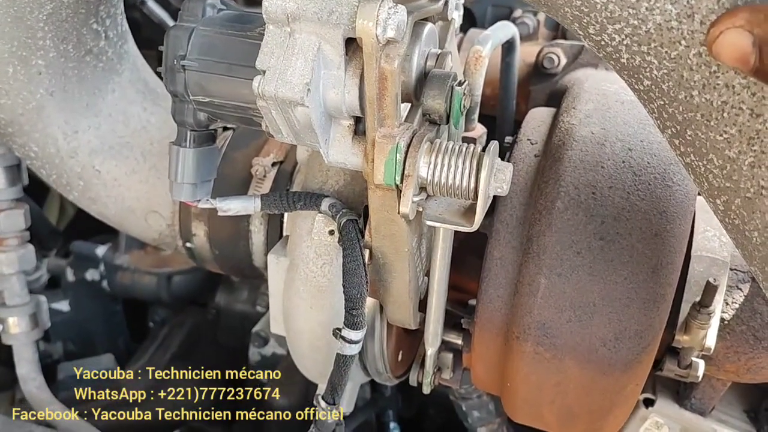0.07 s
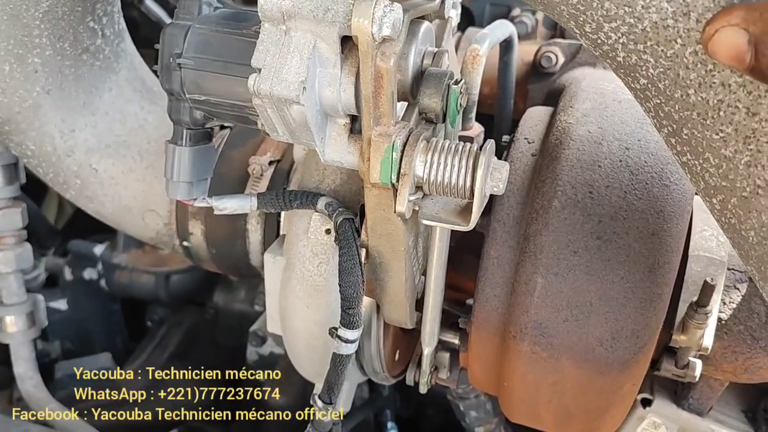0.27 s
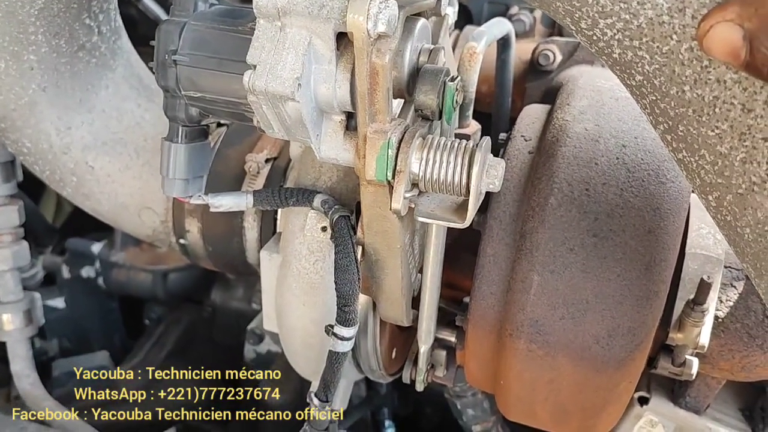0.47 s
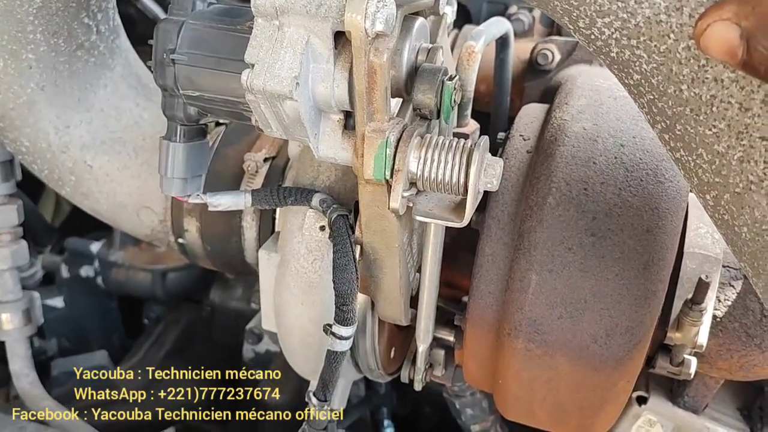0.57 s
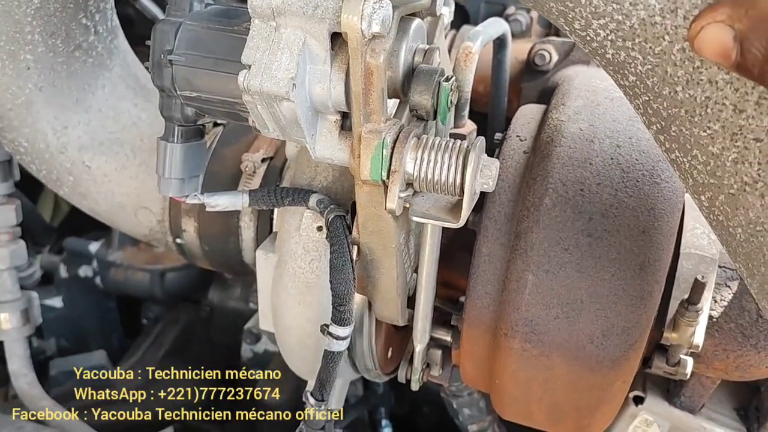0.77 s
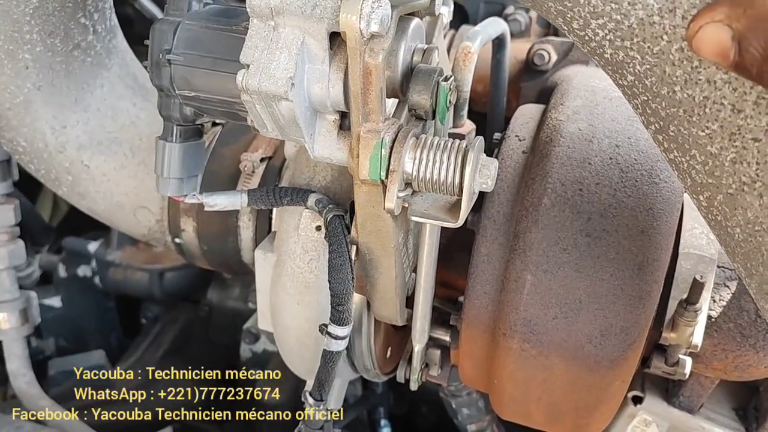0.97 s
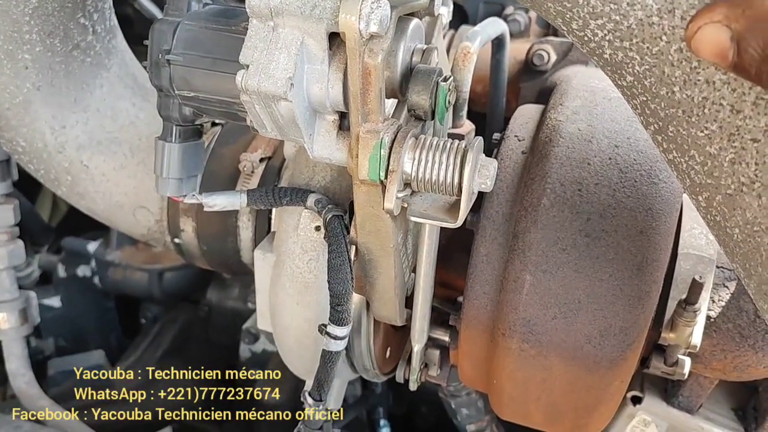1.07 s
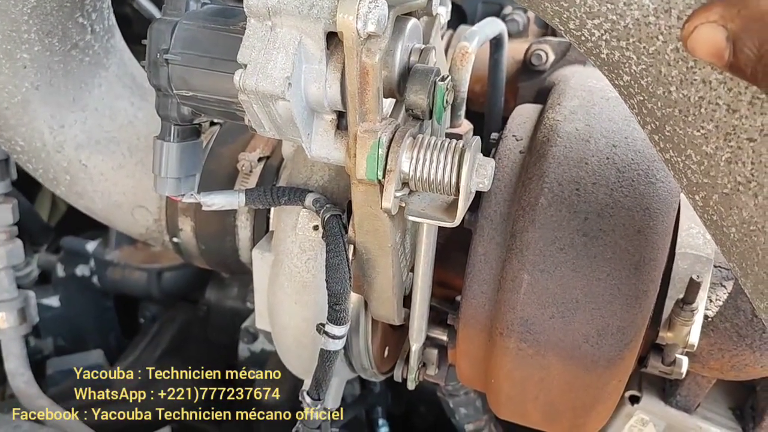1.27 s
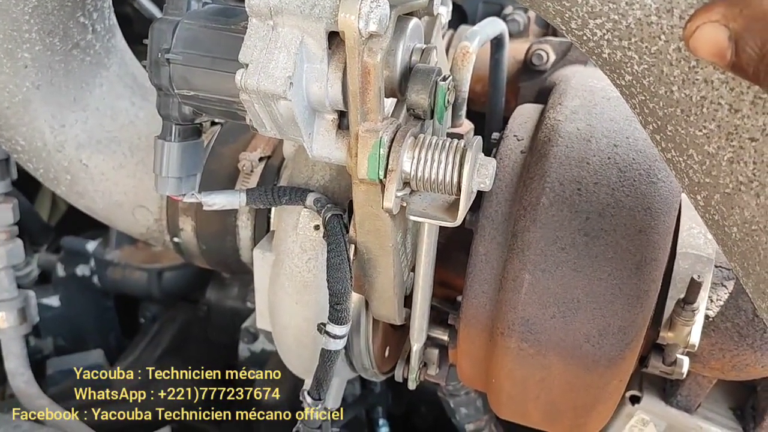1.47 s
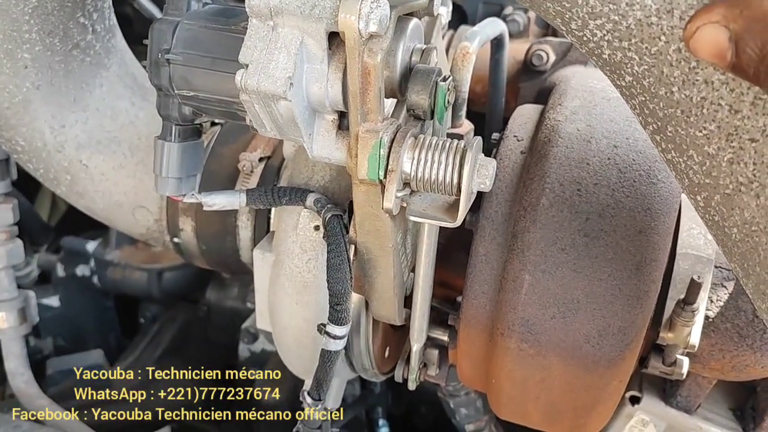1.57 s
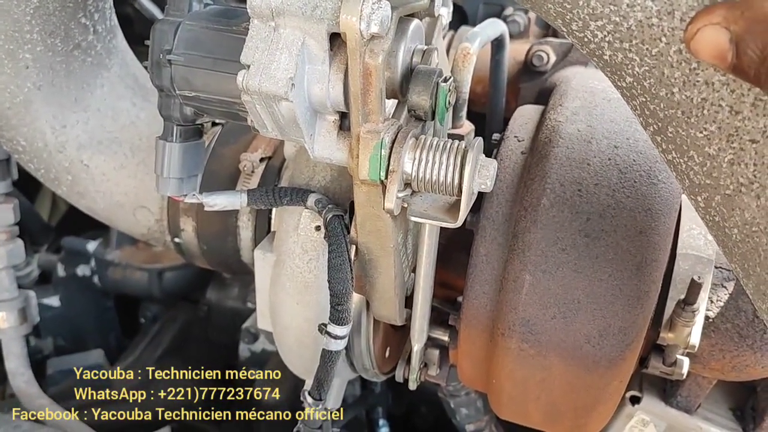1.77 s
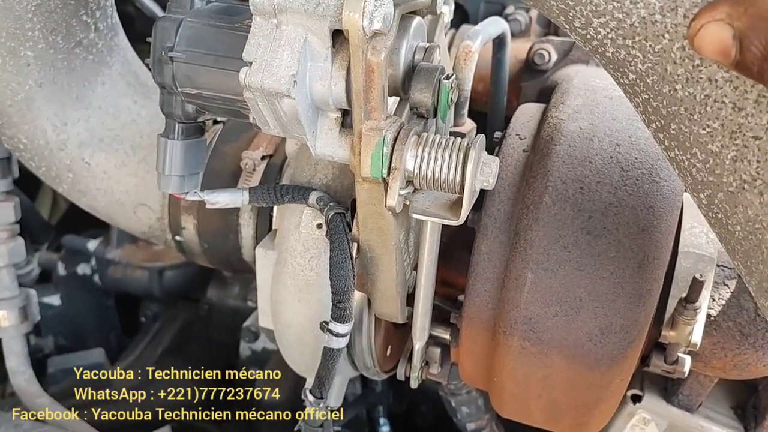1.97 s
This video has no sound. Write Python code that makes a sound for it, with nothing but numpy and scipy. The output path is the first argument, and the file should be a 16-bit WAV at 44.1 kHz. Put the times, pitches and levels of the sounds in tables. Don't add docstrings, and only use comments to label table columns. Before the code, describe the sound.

Electric actuator on a truck engine knocks its metal linkage, clattering and ringing in a windy yard

```python
import sys
import numpy as np
from scipy import signal
from scipy.fft import rfft, irfft, next_fast_len
from scipy.io import wavfile
from scipy.ndimage import uniform_filter1d, map_coordinates

SR = 44100
rng = np.random.default_rng(int(sys.argv[2]) if len(sys.argv) > 2 else 0)


def voltage_ratio(decibels):
    exponent = np.asarray(decibels, float) / 20
    return 10 ** exponent


def bounce(signal):
    frames = np.transpose(np.atleast_2d(signal))
    limited = np.clip(frames, -1, 1)
    pcm = np.round(limited * 32767).astype(np.int16)
    wavfile.write(sys.argv[1], SR, pcm)


N = 88596


def unit(x):
    return x / np.sqrt(np.mean(x ** 2) + 1e-20)


def along(points, hz):
    f, v = np.transpose(points)
    return np.interp(np.log(hz + 1), np.log(f + 1), v)


def wobble(rate, size):
    knots = rng.standard_normal(int(size * 400 / SR) + 4)
    return map_coordinates(knots, [np.arange(size) * min(rate, 399) / SR])


def filtered(x, response):
    m = next_fast_len(x.shape[-1] + 8192)
    spectrum = rfft(x, m) * response(np.fft.rfftfreq(m, 1 / SR))
    return irfft(spectrum, m)[..., :x.shape[-1]]


def peak(hz, centre_hz, width_hz):
    return 1j * hz * width_hz / (centre_hz ** 2 - hz ** 2 + 1j * hz * width_hz)


def rolled_on(hz, corner_hz):
    return 1 / (1 + (corner_hz / (hz + 1)) ** 2)


def add(track, s, sound):
    part = track[..., round(s * SR):][..., :sound.shape[-1]]
    part += sound[..., :part.shape[-1]]


def thumps():
    # start_s, level_db, pitch_hz, t60_s, rebound_db
    strokes = [
        (0.3873, -28.5, 390.5, 0.11, -12.5),
        (0.7271, -7, 291, 0.029, -24),
        (0.7422, -12.5, 304, 0.041, -45),
        (1.0261, -9, 220, 0.016, -31),
        (1.3391, -11, 273.3, 0.04, -32),
        (1.4406, -9.5, 252, 0.027, -21.5),
        (1.6109, -10.5, 253, 0.026, -18),
    ]
    # pitch_hz, level_db
    rebound_modes = [(345, -5.5), (420, -7), (520, -2.5)]
    after_hz = [256.7, 338.4, 391, 539.4]
    after_db = [-22, -32, -29.5, -24.5]
    after_t60_s, after_rise_s = 0.23, 0.026
    overtone, overtone_db = 2.122, -12
    rise_s, rebound_s, rebound_width_s = 0.003, 0.015, 0.0075

    out, t = np.zeros(N), np.arange(SR // 5) / SR
    for s, db, hz, t60, rebound_db in strokes:
        phases = rng.random((2, 8))
        fade = voltage_ratio(-60 * t / t60) * (1 - np.exp(-t / rise_s))
        second = voltage_ratio(overtone_db) * np.cos(2 * np.pi * overtone * hz * t)
        low = fade * (np.sin(2 * np.pi * hz * t) - second)
        rebound = np.zeros(len(t))
        for (f, a), phase in zip(rebound_modes, phases[0]):
            rebound += voltage_ratio(a) * np.sin(2 * np.pi * (f * t + phase))
        rebound *= voltage_ratio(rebound_db) * np.exp(-((t - rebound_s) / rebound_width_s) ** 2)
        after = np.zeros(len(t))
        for f, a, phase in zip(after_hz, after_db, phases[1]):
            after += voltage_ratio(a + 1.5 * wobble(49, size=len(t))) * np.sin(2 * np.pi * (f * t + phase))
        after *= voltage_ratio(-60 * t / after_t60_s) * (1 - np.exp(-t / after_rise_s))
        add(out, s, voltage_ratio(db + 8.0) * (low + rebound + after))
    return out * np.ones((2, 1))


def clatter():
    # start_s, rms_db, t60_s, tilt_db_per_octave, favoured_hz
    bursts = [(0.3857, -27.5, 0.082, -2.5, 3600), (.42, -35.5, 0.053, -3, 770), (0.728, -31, 0.15, 0, 2100),
              (0.74, -21, 0.1, -2.5, 2800), (.764, -18.5, 0.059, -2.5, 1250), (1.03, -17.5, 0.13, 1, 2950),
              (1.2948, -26.5, 0.064, 2, 3040), (1.344, -32, 0.07, -0.5, 2300),
              (1.477, -23.5, 0.13, -4, 1870), (1.447, -30.5, 0.14, 3, 6500),
              (1.486, -20.5, 0.099, -3, 2720), (1.547, -38.5, 0.12, -1, 3050),
              (1.615, -22, 0.35, -1.5, 2770), (1.54, -36.5, 0.68, -6, 750), (1.62, -31.5, 0.72, 3.5, 9500),
              (0.49, -46.5, 0.4, 1.5, 4800), (1.7, -44.5, .9, 0, 4500), (1.68, -47, 0.64, 1, 9500),
              (1.296, -33.5, 0.061, 0.5, 3400), (.386, -34.5, 0.044, -2, 4800),
              (1.025, -35, 0.11, -1, 1500), (1.05, -32.5, 0.17, -4, 1630)]
    # frequency_hz, density_db
    metal = [(180, -40), (300, -4), (713, -3), (856, -2.5), (1150, -6), (2000, -13.5), (4830, -11.5),
             (8500, -14), (16000, -22.5)]
    # pitch_hz, width_hz
    lever = [(520, 8.9), (720, 8.2), (980, 8.2), (1225, 66), (1715, 130), (2015, 100), (2170, 37),
             (2600, 9.4), (3250, 85), (3750, 30), (4500, 34), (5350, 49), (8300, 25)]
    contacts_per_s, bed_db = 3700, -4
    diffuse_db, diffuse_above_hz = 3.5, 570
    favour_db, favour_q, mode_gain_db = 5, 3, 2
    attack_s, hold_share, treble_faster = 0.00015, 0.11, 1.86

    out, t = np.zeros((2, N)), np.arange(SR // 2) / SR
    for s, db, t60, tilt_db, centre_hz in bursts:
        draw = rng.random((2, len(t)))
        noise = rng.standard_normal((4, len(t)))
        hits = (draw[0] < contacts_per_s / SR) * noise[0]
        struck = draw[1, :len(lever)]
        diffuse = filtered(noise[2:], lambda hz: rolled_on(hz, diffuse_above_hz))
        raw = unit(hits) + voltage_ratio(bed_db) * noise[1] + voltage_ratio(diffuse_db) * diffuse

        def colour(hz):
            tilted = voltage_ratio(along(metal, hz) + tilt_db * np.log2((hz + 200) / 2000)) * (hz > 250)
            favoured = 1 + voltage_ratio(favour_db) * peak(hz, centre_hz, centre_hz / favour_q)
            modes = sum(g * peak(hz, c, w) for g, (c, w) in zip(struck, lever))
            return tilted * favoured * (1 + voltage_ratio(mode_gain_db) * modes)

        body = filtered(raw, colour)
        body = body / np.std(body[:, :round(np.clip(t60, .02, .5) * SR / 4)])
        treble = filtered(body, lambda hz: rolled_on(hz, 4000))
        late = np.maximum(t - hold_share * t60, 0) / t60
        shape = (1 - np.exp(-t / attack_s)) * voltage_ratio(db + 0.94 * wobble(121, size=len(t)))
        dying = (body - treble) * voltage_ratio(-60 * late) + treble * voltage_ratio(-60 * treble_faster * late)
        add(out, s, shape * dying)
    return out


def rings():
    # start_s, length_s, pitch_hz, level_db, rise_share
    lever_rings = [(.3855, 0.0083, 3356, -29.5, 0.38), (.39, 0.037, 979, -38, 0.22),
                   (.392, 0.027, 2605, -46, 0.27), (.395, 0.029, 4820, -45, 0.25),
                   (0.483, 0.028, 2290, -48.5, .4), (.746, 0.0071, 2275, -17, 0.58),
                   (.7645, .005, 864, -18, 0.46), (.769, .005, 1300, -26, 0.49),
                   (.772, 0.0032, 820, -22, 0.29), (1.051, 0.033, 720, -30.5, .4),
                   (1.0295, .011, 2100, -23.5, 0.37), (1.038, 0.014, 2033, -23, .5),
                   (1.054, 0.0074, 2050, -26, .4), (1.066, .03, 2020, -30.5, .2),
                   (1.09, 0.043, 2035, -45.5, .3), (1.032, .025, 2886, -35, 0.16),
                   (1.033, 0.019, 4200, -28, 0.25), (1.342, 0.012, 2163, -31.5, 0.67),
                   (1.349, 0.021, 519, -18.5, .35), (1.446, 0.015, 1768, -25.5, 0.28),
                   (1.447, .012, 6580, -31, .4), (1.486, .016, 970, -23.5, .35),
                   (1.488, .012, 1178, -22.5, 0.29), (1.489, 0.015, 2220, -27.5, 0.21),
                   (1.487, 0.016, 3340, -31, .3), (1.49, 0.021, 1602, -27.5, 0.52),
                   (1.617, 0.035, 2055, -28, 0.64), (1.66, 0.077, 2017, -28, 0.49),
                   (1.727, 0.042, 2005, -41, .2), (1.634, 0.027, 2620, -29.5, .5),
                   (1.66, 0.11, 2590, -39, 0.27), (1.615, 0.035, 1198, -31.5, 0.25),
                   (1.62, 0.044, 1737, -31, 0.35), (1.637, 0.032, 2950, -35.5, .4),
                   (1.62, 0.056, 3680, -32, 0.37), (1.624, 0.01, 6050, -28.5, 0.58),
                   (1.66, 0.032, 8300, -42, 0.43), (1.719, 0.12, 5460, -48, .4),
                   (1.748, 0.036, 2890, -38, 0.79)]
    # start_s, length_s, pitch_hz, level_db, rise_share
    squeaks = [
        (.592, .027, 3450, -43, .7),
        (1.79, .085, 1550, -44, .5),
        (1.79, .18, 1650, -48, .4),
        (1.78, .13, 2900, -50, .4),
    ]
    rough_rad, flutter_hz, flutter_db = .55, 140, 1.8

    out, t = np.zeros(N), np.arange(SR // 4) / SR
    for s, length, hz, db, rise in lever_rings + squeaks:
        level = voltage_ratio(flutter_db * wobble(flutter_hz, size=len(t)))
        flutter = level * np.exp(1j * rough_rad * wobble(flutter_hz, size=len(t)))
        top_s = np.clip(rise, .02, .9) * length
        swell = np.sin(np.pi / 2 * np.interp(t, [0, top_s, length], [0, 1, 0])) ** 2
        add(out, s, voltage_ratio(db) * swell * np.real(flutter * np.exp(2j * np.pi * hz * t)))
    return out


def ports(x):
    left_lag_s = 0.0004543
    return filtered(x, lambda hz: np.exp(-2j * np.pi * hz * np.array([[left_lag_s], [0]])))


def wind():
    # time_s, level_db
    left_gusts = [(0, -69), (.25, -49), (.34, -30.5), (.45, -36.5), (.6, -42), (.9, -42.5), (.96, -35),
                  (1.03, -37), (1.1, -40), (1.17, -36.5), (1.28, -48), (1.76, -33), (1.81, -27),
                  (1.88, -32), (1.93, -28.5), (1.97, -35), (2.01, -30)]
    # time_s, level_db
    right_gusts = [(0, -72), (1.88, -58), (1.94, -27), (1.965, -24.5), (2.01, -38)]
    # frequency_hz, density_db
    buffet = [(10, -18), (25, -3.5), (90, 1.5), (150, -1.5), (280, -13.5), (700, -36.5), (1500, -100)]
    t = np.arange(N) / SR
    level_db = np.array([np.interp(t, *np.transpose(g)) for g in (left_gusts, right_gusts)])
    lumps = voltage_ratio(4.5 * np.array([wobble(34.98, size=N), wobble(34.78, size=N)]))
    rumble = filtered(rng.standard_normal((2, N)), lambda hz: voltage_ratio(along(buffet, hz)))
    return voltage_ratio(level_db) * unit(lumps * rumble)


def puffs():
    # centre_s, peak_db, width_s, sign, left_minus_right_db
    pushes = [(.381, -18.5, 0.0023, 1, 30), (.958, -17.5, 0.0021, -1, 25), (0.974, -24, 0.0035, -1, 23),
              (0.996, -23, 0.0035, -1, 22), (1.0356, -24, 0.0032, -1, 19), (1.044, -21.5, .002, 1, 1),
              (1.049, -31, 0.0013, -1, 10), (1.165, -24, 0.0026, -1, 24), (1.799, -19, 0.00098, 1, 29),
              (1.803, -16.5, 0.0013, 1, 34), (1.846, -19.5, 0.001, -1, 23), (1.86, -18, 0.0026, -1, 33),
              (1.917, -16.5, 0.0018, -1, 32), (1.941, -17.5, 0.0018, -1, 43), (1.96, -14.5, 0.0012, 1, 8)]
    out, t = np.zeros((2, N)), np.arange(N) / SR
    for s, db, width, sign, pan_db in pushes:
        u = ((t - s) / width) ** 2
        out += np.sign(sign) * voltage_ratio([[db], [db - pan_db]]) * (1 - u) * np.exp(-u / 2)
    return out


def yard(x):
    # frequency_hz, t60_s
    decay = [(200, 0.15), (2000, 0.14), (10000, 0.064)]
    hz, t, z = signal.stft(rng.standard_normal((2, SR // 2)), SR, nperseg=256)
    fade = voltage_ratio(-60 * t / along(decay, hz)[:, None])
    tail = signal.istft(z * fade, SR, nperseg=256)[1]
    delayed = np.pad(x, ((0, 0), (300, 0)))
    return signal.fftconvolve(delayed, tail / np.linalg.norm(tail[0]), axes=1)[:, :N]


def background():
    # frequency_hz, density_db
    hiss = [(24, -37), (40, 0.5), (112, 1), (200, -10), (436, -7), (561, -10.5), (3180, -21), (6760, -22),
            (16300, -32)]
    # frequency_hz, power_share
    alike = [(100, 0.99), (450, 0.86), (800, 0.081), (3000, 0.2), (10000, 0.071)]
    # pitch_hz, width_hz, level_db
    hums = [(436.9, 22, -49.5), (373, 29, -61)]
    hiss_db = -39.5

    z = signal.stft(rng.standard_normal((3, N)), nperseg=512)[2]
    patches = uniform_filter1d(rng.standard_normal(z.shape[1:]), size=6, axis=0)
    patches = uniform_filter1d(patches, size=12, axis=1)
    noise = signal.istft(z * voltage_ratio(1.15 * unit(patches)), nperseg=512)[1][:, :N]
    share = lambda hz: np.clip(along(alike, hz), 0, 1)
    near = filtered(noise[0], lambda hz: voltage_ratio(along(hiss, hz)) * np.sqrt(share(hz)))
    wide = filtered(noise[1:], lambda hz: voltage_ratio(along(hiss, hz)) * np.sqrt(1 - share(hz)))
    hum = np.zeros(N)
    for c, w, db in hums:
        hum += voltage_ratio(db) * unit(filtered(rng.standard_normal(N), lambda hz: peak(hz, c, w) ** 2))
    return voltage_ratio(hiss_db) * unit(ports(near) + wide) + hum


def scene():
    left_db, yard_db, wind_leak_db = 0.5, -12, -16.5
    knocks = thumps() + clatter() * voltage_ratio([[left_db], [0]])
    tones = rings()
    direct = ports(knocks) + tones * voltage_ratio([[2], [-2]])
    answer = voltage_ratio(yard_db) * yard(knocks + tones)
    leak = np.array([[1, 0], [voltage_ratio(wind_leak_db), 1]])
    return direct + answer + leak @ (wind() + puffs()) + background()


def top_cut(x):
    return signal.sosfilt(signal.butter(12, 15900, fs=SR, output="sos"), x)


def record(dry):
    # centre_hz, width_hz, gain_db
    left_port = [(1540, 2900, 1), (4300, 710, -1.5), (4500, 310, -3.5), (7700, 360, -1.5),
                 (9200, 660, -0.5), (9730, 1000, 2.5), (11600, 340, -2)]
    # centre_hz, width_hz, gain_db
    right_port = [(4680, 1430, -4.5), (5750, 1200, 4.5), (7550, 370, -0.5), (8050, 590, -4),
                  (11800, 450, -13)]
    top, band_hz = .55, 15770
    bumps = lambda hz, port: voltage_ratio(sum(db / (1 + (2 * (hz - c) / w) ** 2) for c, w, db in port))
    heard = filtered(dry, lambda hz: np.array([bumps(hz, left_port), bumps(hz, right_port)]))
    rounded = heard / (1 + np.abs(heard / top) ** 4) ** .25
    mix = filtered(rounded, lambda hz: hz < band_hz)
    return top_cut(mix)


dry = scene()
out = record(dry)
bounce(out)
```